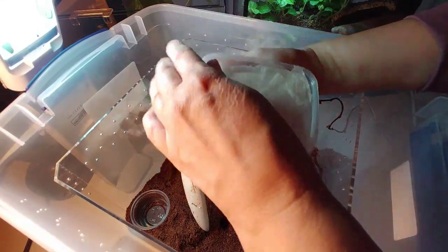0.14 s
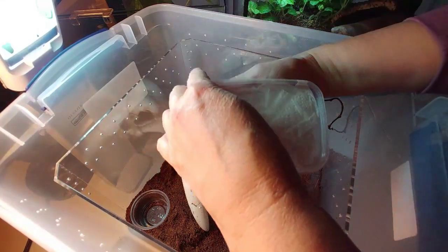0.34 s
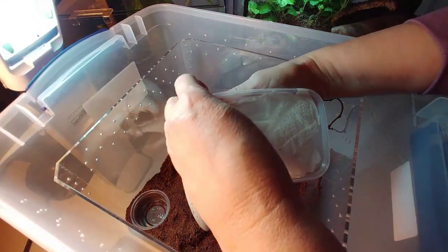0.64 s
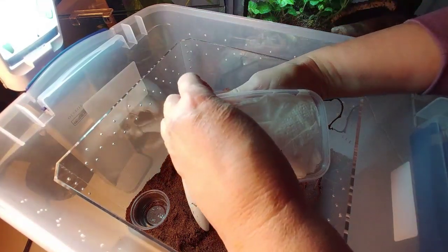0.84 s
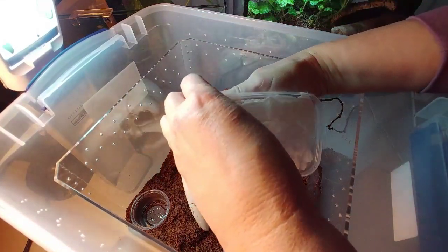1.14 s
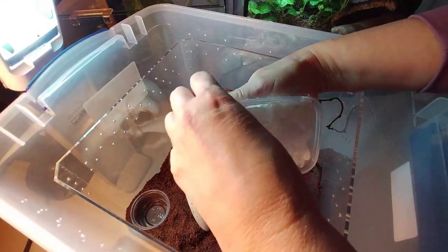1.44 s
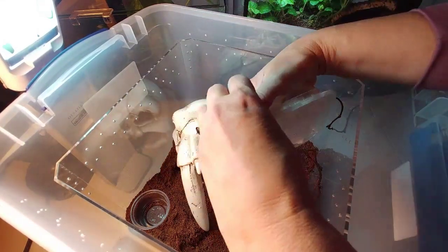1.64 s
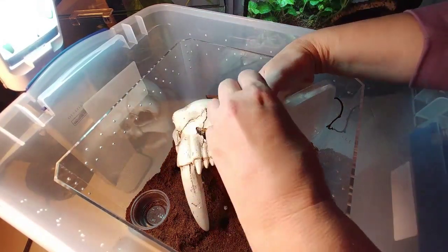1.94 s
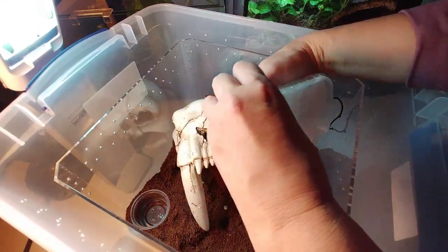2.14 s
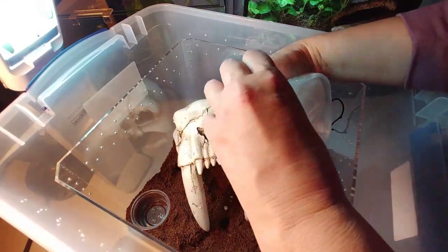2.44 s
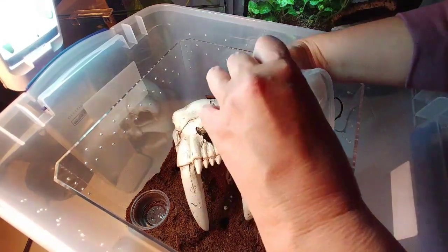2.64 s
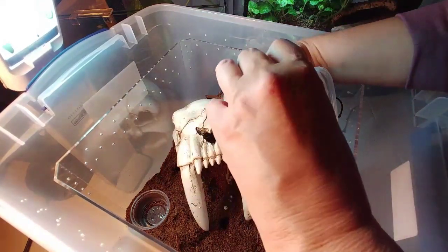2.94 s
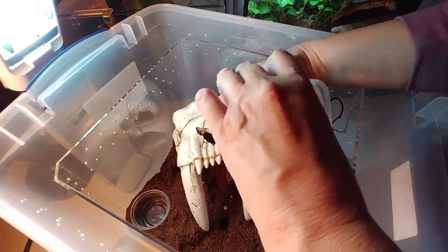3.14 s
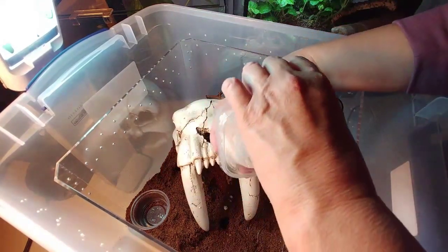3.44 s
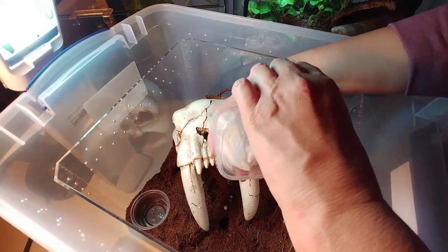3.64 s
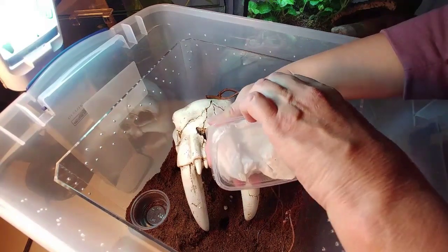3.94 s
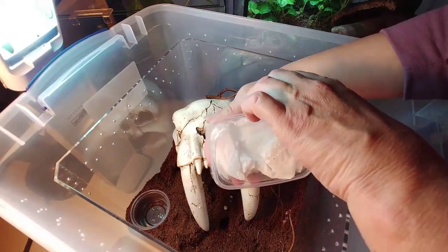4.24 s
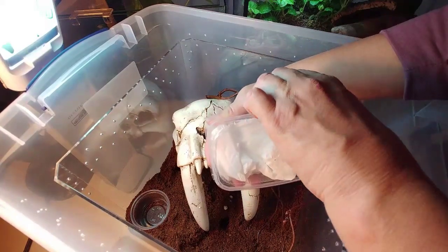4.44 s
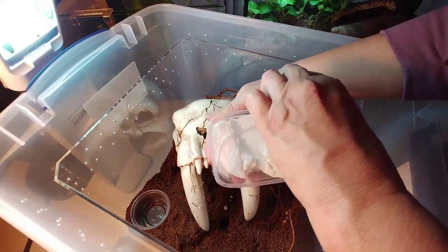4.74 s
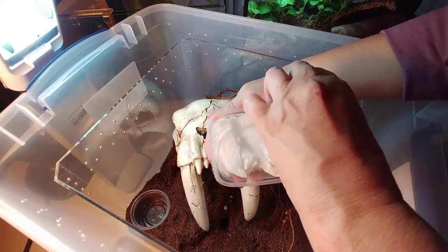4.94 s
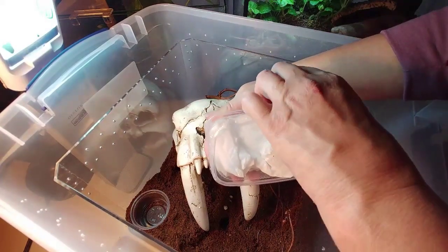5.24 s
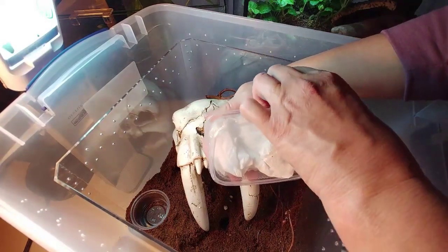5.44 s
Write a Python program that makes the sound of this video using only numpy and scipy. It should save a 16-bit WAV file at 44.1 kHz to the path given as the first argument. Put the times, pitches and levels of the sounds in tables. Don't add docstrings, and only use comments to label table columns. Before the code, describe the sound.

Close stereo sound of hands working a thin plastic container lid inside an open plastic storage bin. Quiet skin rubbing and a small early snap come first, then faint ticks and a brief hollow drag. A very loud crack bursts just after two seconds, with bumping and tapping; another follows near 3.3 seconds with chatter. Smaller snaps trail off in a small quiet room.

```python
import sys
import numpy as np
from scipy import signal
from scipy.io import wavfile
from scipy.ndimage import uniform_filter1d, minimum_filter1d

SR = 44100
rng = np.random.default_rng(int(sys.argv[2]) if len(sys.argv) > 2 else 0)


def digitize_waveform(pressure):
    field = np.atleast_2d(pressure).T
    bounded = np.clip(field, -1, 1)
    quanta = np.round(bounded * 32767).astype(np.int16)
    wavfile.write(sys.argv[1], SR, quanta)


def natural_amplitude(level_db):
    exponent = np.asarray(level_db, float) / 20
    return 10 ** exponent


N = 246066

# frequency in Hz, density in dB per Hz.
ROOM_TONE = [(25, 1), (59, -5.5), (129, 0), (261, -13), (936, -20.5), (1620, -29), (2210, -28),
             (12700, -46)]
# frequency in Hz, level in dB.
MAINS_HUM = [(60, -73.5), (120, -71.5)]
# time in seconds, level in dB.
GRIP_LEVEL = [(0.0, -72), (0.12, -81.5), (0.24, -79.5), (1.1, -86), (1.3, -71.5), (1.51, -84.5),
              (1.9, -86.5), (2.17, -71), (2.35, -72.5), (2.47, -78.5), (2.69, -68.5), (2.73, -81),
              (3.15, -80.5), (3.36, -68), (3.62, -74.5), (4.4, -82.5), (5.3, -83), (5.58, -76)]
GRIP_SHARES = (-5.5, -0.5, -11.5)
# start in seconds, length in seconds, level in dB, patch frequency in Hz.
FINGER_SLIDES = [(0.0, 0.22, -79, 4330), (0.29, 0.036, -73, 3200), (0.347, 0.088, -76.5, 3200),
                 (0.469, 0.011, -73, 5500), (0.766, 0.1, -73, 2270), (1.062, 0.093, -69, 2300),
                 (1.177, 0.071, -72.5, 4570), (1.287, 0.046, -58.5, 4600), (1.347, 0.026, -67.5, 5700),
                 (2.123, 0.036, -60.5, 5670), (2.32, 0.024, -58, 3430), (2.549, 0.12, -67, 1070),
                 (2.812, 0.061, -70, 8400), (2.861, 0.09, -72.5, 1220), (3.171, 0.066, -58, 1086),
                 (3.237, 0.059, -53.5, 617), (3.298, 0.098, -56, 5217), (3.466, 0.078, -76, 8130),
                 (3.681, 0.032, -81.5, 8200), (3.787, 0.022, -76.5, 1290), (3.884, 0.03, -64.5, 4420),
                 (3.912, 0.094, -68.5, 8540), (4.318, 0.045, -70, 1130), (4.616, 0.093, -77.5, 2496),
                 (4.735, 0.044, -70, 1308), (4.762, 0.07, -66, 3930), (4.944, 0.034, -65.5, 8650),
                 (5.133, 0.045, -64, 1674), (5.184, 0.049, -80.5, 5200), (5.535, 0.061, -73.5, 1200),
                 (3.273, 0.019, -52, 4500), (2.817, 0.032, -66.5, 1301), (1.279, 0.018, -71, 4400),
                 (2.031, 0.094, -84, 2230), (3.224, 0.022, -56, 3200), (3.35, 0.075, -61, 5000),
                 (3.375, 0.04, -63, 1900), (4.925, 0.022, -71, 4300), (5.0, 0.06, -80, 4500),
                 (0.03, 0.16, -85, 8000), (1.075, .06, -77, 1300), (3.98, .12, -74, 330)]
# time in seconds, level in dB.
STIR_LEVEL = [(0.0, -76), (2.11, -74), (2.21, -56.5), (2.33, -54), (2.69, -58.5), (2.73, -71), (3.1, -75.5),
              (3.23, -59), (3.45, -69.5), (3.93, -62.5), (4.05, -68), (4.2, -71.5), (4.33, -66),
              (4.5, -76.5), (4.79, -65.5), (5.35, -71), (5.58, -72)]
# start in seconds, peak in dB, frequency in Hz.
FINGER_TAPS = [(0.0267, -69, 790), (1.5706, -52, 1220), (2.013, -62, 800), (2.3283, -47, 480),
               (2.497, -50, 330), (2.575, -52, 330), (2.599, -50, 800), (2.6193, -38, 1010),
               (2.6928, -55, 1054), (2.8389, -47, 1200), (2.9281, -46, 453), (3.1893, -47, 1028),
               (3.196, -45, 960), (3.203, -41, 900), (3.3685, -39.5, 960), (3.516, -48.5, 1100),
               (3.75, -58.5, 1104), (3.7922, -56.5, 1076), (4.3369, -54.5, 1001), (4.76, -52, 1008),
               (4.884, -64.5, 622), (4.958, -50, 1048), (5.1402, -45, 530), (5.1403, -55, 1080),
               (5.56, -50, 447), (5.5657, -40, 788), (5.573, -40, 1090), (5.5765, -41.5, 1250)]
# start in seconds, peak in dB, frequency in Hz, decay in cycles,
# left minus right in dB.
WALL_POPS = [(0.482, -45, 840, 1.8, 5), (1.3116, -45, 665, 0.31, 1), (2.1518, -12, 733, 1.4, 4.5),
             (2.151, -12, 1990, 3.1, 10), (2.156, -11.5, 1282, 3.75, -4), (2.8849, -40, 714, 1, -10),
             (2.889, -43, 1285, 2, 4), (3.2229, -18, 683, 0.54, -5.5), (3.229, -30, 518, 3.6, -3),
             (3.2879, -13, 1210, 3.1, -1), (3.2884, -26, 524, 2.2, -13), (3.289, -14.5, 2158, 2.5, 2.5),
             (1.298, -51, 610, 1.5, 4), (3.9086, -35, 1120, 1.43, -0.5), (3.97, -29.5, 1022, 0.76, -1),
             (4.7703, -30, 1220, 3.15, 0), (4.771, -36, 543, 1.9, 1.5), (4.9307, -35, 436, 1.2, -9.5),
             (4.932, -40, 1050, 3, 1), (5.173, -42.5, 861, 0.83, -4.5), (5.187, -31.5, 1200, 2.7, 0)]
# start in seconds, peak in dB, frequency in Hz,
# decay in cycles, left minus right in dB.
LID_CHATTER = [(3.297, -35, 1100, 1.5, 0), (3.309, -35, 880, 1.5, 0), (3.314, -39, 1270, 1.5, 0),
               (3.321, -43, 1170, 1.5, 0), (3.331, -43, 1310, 1.5, 0), (3.338, -43, 821, 1.5, 0),
               (3.347, -42, 1240, 1.5, 0), (3.2882, -18, 4350, 6.8, 0), (5.1875, -36, 4160, 6, -1),
               (5.1875, -35.5, 2450, 5.1, 0), (5.192, -35, 5200, 13, 0), (4.7712, -34.5, 1860, 5, 0),
               (4.7716, -37, 2950, 7, 0), (2.8925, -47, 810, 1.2, 0), (1.3138, -43.5, 3500, 1.4, 0),
               (1.319, -48, 2950, 3, 0), (1.322, -50, 4500, 3, 2), (5.8, -51, 450, 1.5, 0),
               (4.9615, -55, 2050, 5, 0), (5.8, -61, 990, 5, 0), (3.238, -37, 520, 3, 0),
               (2.1608, -26, 3400, 3, 0), (2.165, -29, 3000, 3, 0)]
# start in seconds, peak in dB, frequency in Hz,
# decay in cycles, left minus right in dB.
DRY_FLARES = [
    (2.3225, -47, 2500, 5, 0),
    (2.328, -49, 3500, 5, 0),
    (3.2885, -28, 7700, 10, 0),
    (3.2885, -24, 1850, 3, 3),
    (4.9605, -56, 1050, 4, 0),
    (4.772, -42, 760, 2, 0),
]
# frequency in Hz, width in Hz, level in dB.
TUB_MODES = [(337, 160, -6), (530, 190, 0), (800, 580, -3.5), (1220, 270, 3.5)]
# frequency in Hz, width in Hz, level in dB.
LID_MODES = [(1200, 350, 3.5), (1780, 910, 0.5), (2530, 1000, 1), (3440, 950, 0), (4210, 590, -1.5),
             (5200, 1300, -6)]
# frequency in Hz, width in Hz, level in dB.
LID_TREBLE = [(7168, 2100, -3.5), (9010, 1500, 3.5), (10900, 1600, -7)]
# frequency in Hz, level in dB, 60 dB decay in seconds.
ROOM_ECHO = [(150, -43.5, .25), (378, -34, 0.6), (900, -30.5, 0.26), (1980, -37, 0.38), (3200, -41, 0.32),
             (4640, -36, .27), (7700, -32, 0.27), (11837, -39.5, 0.18)]
# start in seconds, peak in dB, treble relative to it in dB,
# length in milliseconds, left minus right in dB.
RIM_CRACKS = [(0.4802, -31.5, -17, 1.97, 0.5), (0.484, -51.5, -1.5, 2.6, 8), (1.293, -64, -14, 2.3, 0),
              (1.301, -57, -14, 2.5, 0), (1.306, -49, -14, 2.6, 5), (1.311, -45, -11, 1.2, -3),
              (1.3153, -44.5, -7, 1.1, 2), (2.1516, -8, -1, 0.82, 2), (2.1556, -7.5, -16.5, 0.65, 4),
              (2.3216, -47, -8, 4, 1.5), (3.288, -9.5, -14.5, 0.75, -2.5), (3.9078, -25.5, -2.5, 3.2, 3),
              (4.7713, -25, -3, 1.97, -3.5), (4.961, -53, 3, 2.8, 4), (5.1734, -42.5, -7, 1.3, -6),
              (5.1871, -26, -7.5, 1.2, 1), (5.19, -37.5, -23, 2.2, 7)]
# start in seconds, peak in dB, treble relative to it in dB,
# left minus right in dB.
LID_CLICKS = [(1.5699, -61, -9, 0), (2.619, -51.5, -24, -3.5), (2.838, -51.5, 4, -9),
              (2.8843, -57, -4, -2.5), (2.889, -54, -6.5, 0), (2.926, -54.5, -15, 1.5),
              (3.205, -51, -18, -4.5), (3.222, -30, -12.5, -2), (3.7103, -60, -8, -7),
              (3.7916, -60, -12, 1.5), (3.9687, -47.5, -12, 4.5), (4.3352, -60, -12, 9),
              (4.6788, -61.5, -18, 4), (4.703, -60, -11, -4), (5.14, -54, -14.5, -2.5)]
# start in seconds, peak in dB.
RIM_TICKS = [(0.6012, -71), (0.7777, -62), (1.055, -65.5), (1.186, -64), (1.4316, -66), (1.4955, -67.5),
             (3.5125, -68.5), (4.1332, -67), (4.456, -70), (4.5, -70.5), (4.8847, -75), (4.93, -60.5),
             (5.0332, -67.5), (5.446, -67), (5.5654, -68.5)]
# start in seconds, level in dB, frequency in Hz, width in Hz,
# 60 dB decay in seconds.
RIM_SHIVERS = [(0.48, -61, 5200, 650, 0.19), (2.157, -33.5, 2740, 2400, 0.36),
               (3.29, -39.5, 4400, 1500, 0.25), (3.29, -35.5, 3000, 3000, 0.18),
               (3.972, -57, 1260, 1400, 0.22), (4.772, -53, 4100, 2700, 0.22),
               (2.157, -42, 8500, 1500, 0.28), (4.771, -53, 1210, 200, 0.2), (4.938, -43.5, 390, 260, 0.11),
               (5.19, -50, 5150, 800, 0.22), (5.189, -51, 4000, 2200, 0.15), (5.195, -62, 1095, 300, 0.33),
               (3.24, -44, 560, 250, 0.22), (3.245, -52, 1250, 400, 0.3), (3.3, -45.5, 5200, 900, 0.33),
               (2.929, -56.5, 520, 360, 0.095)]
# start in seconds, peak in dB, boom frequency in Hz, decay in cycles.
BIN_THUMPS = [(0.481, -54.5, 159, 5.1), (2.149, -33.5, 177, 1.5), (2.157, -53, 39.5, 0.81),
              (2.182, -35, 115.4, 2.8), (2.248, -43.5, 50.4, 0.97), (2.331, -49.5, 60.5, 1.5),
              (2.429, -51, 42.3, 1.14), (2.495, -41.5, 140.1, 0.92), (2.506, -43, 64.4, 1.2),
              (2.573, -38.5, 139.6, 1.03), (3.219, -37, 93, 0.57), (3.287, -37.5, 144, 1.2),
              (3.509, -58.5, 74.4, 1.13), (3.698, -60.5, 85.6, 0.98), (3.905, -51, 142.5, 0.97),
              (4.28, -56, 55.7, 1.2), (4.771, -60, 201, 0.85), (4.93, -42.5, 190, 1.05),
              (5.172, -47, 200, 1.2), (5.562, -48.5, 166, 0.82)]
# start in seconds, peak in dB, left minus right in dB.
NAIL_CATCHES = [
    (2.1304, -33, -13.5),
    (2.8385, -50, -5),
    (5.141, -50, 0),
    (4.884, -60, 0),
    (1.306, -46, 0),
    (1.308, -46, 0),
    (1.3098, -46, 0),
    (1.3165, -47, 0),
    (3.2235, -38, 0),
]
# time in seconds, level in dB, shell frequency in Hz.
DRAG_PATH = [
    (1.695, -92, 390),
    (1.719, -60.5, 388),
    (1.757, -62, 381),
    (1.785, -64.5, 400.2),
    (1.917, -65, 364),
    (1.973, -68.5, 375.3),
    (1.995, -63, 380.4),
    (2.069, -66.5, 371.4),
    (2.12, -70, 350),
]
# frequency in Hz, width in Hz, level in dB.
SHELL_OVERTONES = [(840, 250, -17.5), (1920, 220, -17), (2230, 300, -11.5), (3630, 2300, -21.5)]
# start in seconds, level in dB.
RIM_STRIKES = [
    (2.157, -34),
    (3.29, -38),
    (4.772, -49.5),
    (5.19, -53),
]
# frequency in Hz, level in dB, 60 dB decay in seconds.
FIRST_HOLD = [(727, -16, 0.89), (910, -13, 0.24), (1367, 0, 0.11), (1852, -14, 0.38), (2875, -2, 0.12),
              (3620, 0, 0.13), (4441, -4, 0.16), (5679, -12, 0.21), (7607, -11, 0.17), (7704, -15, 0.2),
              (8419, -13, 0.22), (8522, -15, 0.28), (9496, -23, 0.24), (9981, -29, 0.4)]
SECOND_HOLD = [(1238, -6, 0.39), (1910, -8, 0.2), (2960, -2, 0.16), (3391, -9, 0.24), (4075, 0, 0.14),
               (4253, -5, 0.25), (4500, -4, 0.23), (4576, -13, 0.97), (4823, -5, 0.26), (5070, -1, 0.094),
               (5125, -3, 0.11), (5303, -29, 5.0), (8247, -22, 0.81), (8484, -15, 0.21)]
THIRD_HOLD = [(1141, -6, 0.18), (1378, -10, 0.15), (1653, -11, 0.14), (1857, -4, 0.11), (2460, -8, 0.15),
              (2950, -2, 0.16), (3499, 3, 0.089), (3930, -11, 0.29), (4404, -13, 0.3), (4560, -7, 0.14),
              (4657, -23, 0.23), (5055, -16, 0.24), (5566, -14, 0.22), (6089, -10, 0.12)]
LAST_HOLD = [(958, -9, 0.15), (1232, -9, 0.2), (2444, -4, 0.1), (3548, -12, 0.23), (4032, -11, 0.24),
             (4339, -19, 0.43), (4727, -1, 0.12), (5039, -13, 0.43), (5179, -8, 0.3), (6019, -20, 0.24)]


def unit(x):
    return x / np.sqrt(np.mean(x ** 2))


def band(x, hz, width_hz):
    return signal.lfilter(*signal.iirpeak(hz, hz / width_hz, fs=SR), x)


def band_twice(x, hz, width_hz):
    return band(band(x, hz, width_hz), hz, width_hz)


def modes(x, table):
    return sum((-1) ** k * natural_amplitude(db) * band(x, hz, width_hz) for k, (hz, width_hz, db) in enumerate(table))


def curves(table, off_db=-120):
    times, *columns = np.transpose(table)
    return [np.interp(np.arange(N) / SR, times, column, off_db, off_db) for column in columns]


def walk(rate):
    hold = int(SR / rate)
    steps = np.repeat(rng.standard_normal(N // hold + 1), hold)
    return 1.3 * uniform_filter1d(uniform_filter1d(steps, hold), hold)[:N]


def lean(left_minus_right_db):
    return natural_amplitude(np.array([[left_minus_right_db], [-left_minus_right_db]]) / 2)


def add(out, start_s, sound):
    i = int(start_s * SR)
    out[:, i:i + sound.shape[1]] += sound[:, :N - i]


def peak(x, db):
    return x * natural_amplitude(db) / np.max(np.abs(x.mean(axis=0)))


def air(level_db=-69.5, lean_db=4.5):
    tone, t = 0, np.arange(N) / SR
    table = np.array(ROOM_TONE)
    for hz in 28 * 2 ** np.arange(0, 9, .5):
        noise = unit(band_twice(rng.standard_normal((2, N)), hz, hz / 2))
        density_db = np.interp(np.log(hz), np.log(table[:, 0]), table[:, 1])
        db = density_db + 10 * np.log10(hz)
        tone = tone + natural_amplitude(db + 0.54 * walk(5.8)) * noise
    hum = 0
    for hz, db in MAINS_HUM:
        level = natural_amplitude(db + 1.6 * walk(7.1)) * np.sqrt(2)
        hum = hum + level * np.sin(2 * np.pi * hz * t + 0.63 * walk(14))
    return unit(tone) * natural_amplitude(level_db) * lean(lean_db) + hum


def hiss(db=-97, hz=8300, width_hz=1200):
    noise = rng.standard_normal((2, N))
    return natural_amplitude(db + 1.5 * walk(4)) * unit(band_twice(noise, hz, width_hz))


def rub(flicker_db=1.0, flicker_rate=60, edge=1.0, patchy_db=1.0, squeak_db=-1.0):
    slips = rng.standard_normal((2, N)) * natural_amplitude(2.1 * rng.exponential(size=(2, N)))
    gains = natural_amplitude(curves(GRIP_LEVEL) + np.array(GRIP_SHARES)[:, None])
    out = np.zeros((2, N))
    middle_hz, middle_db, db_per_octave = 3001, np.array((-3, -1.5, -18)), np.array((3.5, -0.5, 2))
    for s, length_s, slide_db, hz in FINGER_SLIDES:
        db = slide_db + middle_db + db_per_octave * np.log2(hz / middle_hz)
        i, size = int(s * SR), int(length_s * SR)
        swell = (np.sin(np.pi * np.arange(size) / size) ** edge)[:N - i]
        gains[:, i:i + size] += natural_amplitude(db)[:, None] * swell
        patch = unit(band_twice(slips[:, i:i + size], hz, .28 * hz))
        add(out, s, patch * swell * natural_amplitude(slide_db + squeak_db))
    hiss_body_top = LID_MODES[2:], TUB_MODES[2:] + LID_MODES[1:2], LID_TREBLE[:2]
    for table, gain in zip(hiss_body_top, gains):
        ringing = 0
        for hz, width_hz, db in table:
            ringing = ringing + natural_amplitude(db + patchy_db * walk(15)) * band_twice(slips, hz, 1.9 * width_hz)
        out = out + gain * unit(ringing)
    return out * natural_amplitude(flicker_db * walk(flicker_rate))


def stir(alike=0.68):
    noise = rng.standard_normal((3, N))
    shake = alike * noise[0] + noise[1:]
    walls = modes(shake, [(48.6, 17, -4.5), (112, 18, 4.5), (190, 40, -3.0), (330, 110, -5)])
    return unit(walls) * natural_amplitude(curves(STIR_LEVEL)[0] + 4 * walk(14))


def knocks(blows, soft_turns=0.37, rattle=0.81, rattle_s=0.0033, tub_db=-5, push_turns=.2):
    out, t = np.zeros((2, N)), np.arange(2048) / SR
    for s, db, hz, cycles, pan_db in blows:
        turns = hz * t
        rise = 1 - np.exp(-(turns / soft_turns) ** 2)
        ring = -np.sin(2 * np.pi * turns) * rise * np.exp(-turns / cycles)
        tub = modes(np.exp(-(turns / push_turns - 2) ** 2), TUB_MODES)
        shake = rng.standard_normal((2, len(t))) * rise * np.exp(-t / rattle_s)
        dull = band(band_twice(shake, hz, 1.5 * hz), hz, 1.5 * hz)
        sound = unit(ring) + natural_amplitude(tub_db) * unit(tub) + rattle * unit(dull)
        add(out, s, peak(sound, db) * lean(pan_db))
    return out


def echoes(x, bin_db=6, bin_t60=0.024, build_s=0.009, top_hz=11800):
    t = np.arange(SR // 2) / SR
    response = 0
    for hz, db, t60 in ROOM_ECHO:
        fade = 1000. ** (-t / t60) + natural_amplitude(bin_db) * 1000. ** (-t / bin_t60)
        noise = band_twice(rng.standard_normal((2, len(t))), hz, 0.45 * hz)
        response = response + natural_amplitude(db) * noise * fade
    response = response * (1 - np.exp(-(t / build_s) ** 2))
    response = signal.sosfilt(signal.butter(6, top_hz, fs=SR, output="sos"), response)
    return signal.fftconvolve(x, response, axes=1)[:, :N]


def snaps(rise_s=0.0005, tail_times=6.2, tail_db=-17, apart=2.4, favour_db=3):
    near, far, t = np.zeros((2, N)), np.zeros((2, N)), np.arange(2048) / SR
    slips = [(*row, 4700) for row in RIM_CRACKS]
    slips += [(s, db, top_db, 2.3, pan_db, 1900) for s, db, top_db, pan_db in LID_CLICKS]
    slips += [(s, db, -9, 1.9, 0, 3340) for s, db in RIM_TICKS]
    for s, db, top_db, ms, pan_db, hz in slips:
        tail = natural_amplitude(tail_db) * np.exp(-1000 * t / ms / tail_times)
        shape = (1 - np.exp(-(t / rise_s) ** 2)) * (np.exp(-1000 * t / ms) + tail)
        shake = rng.standard_normal((3, len(t))) * shape
        shake = np.vstack([shake[0] + apart * shake[1:], t == 0])
        lid = modes(shake, LID_MODES[1:])
        body = lid + natural_amplitude(favour_db) * band(lid, hz, 0.36 * hz)
        treble = modes(shake, LID_TREBLE)
        for part, part_db in ((body, db), (treble, db + top_db)):
            sound = peak(part[:2], part_db)
            add(near, s, sound * lean(pan_db))
            add(far, s, unit(part[[2, 2]]) * np.std(sound))
    return near, far


def rings(rise_s=.003):
    out, t = np.zeros((2, N)), np.arange(SR // 4) / SR
    for s, db, hz, width_hz, t60 in RIM_SHIVERS:
        cluster = band_twice(rng.standard_normal((2, len(t))), hz, width_hz)
        add(out, s, natural_amplitude(db) * unit(cluster) * (1 - np.exp(-t / rise_s)) * 1000. ** (-t / t60))
    return out


def thumps(lean_db=-9, sag=0.067):
    out, t = np.zeros((2, N)), np.arange(8192) / SR
    for s, db, hz, cycles in BIN_THUMPS:
        turns = hz * t
        swell = (1 - np.exp(-(turns / 0.1) ** 2)) * np.exp(-turns / cycles)
        boom = np.sin(2 * np.pi * turns ** (1 - sag)) * swell
        add(out, s, peak(boom * lean(lean_db), db))
    return signal.sosfilt(signal.butter(2, 32, "high", fs=SR, output="sos"), out)


def nail(hz=4000, width_hz=9000):
    out = np.zeros((2, N))
    tick = band(-1. * (np.arange(256) == 0), hz, width_hz)
    for s, db, pan_db in NAIL_CATCHES:
        add(out, s, peak(tick * lean(pan_db), db))
    return out


def drag(width_hz=22, lean_db=-6):
    level_db, hz = curves(DRAG_PATH)
    noise = rng.standard_normal(N) + 1j * rng.standard_normal(N)
    wander = signal.lfilter([1], [1, -np.exp(-np.pi * width_hz / SR)], noise)
    turns = np.cumsum(np.maximum(hz, 0)) / SR
    shell = unit(np.real((wander / np.std(wander) + 1.2) * np.exp(2j * np.pi * turns)))
    grit = rng.standard_normal((2, N))
    overtones = 0
    for f, w, db in SHELL_OVERTONES:
        overtones = overtones + natural_amplitude(db + 2.0 * walk(33)) * unit(band_twice(grit, f, w))
    return natural_amplitude(level_db) * (shell * lean(lean_db) + overtones)


def rim(rise_s=.002, split=.006, twin_db=-5, longest_s=.35):
    out, t = np.zeros((2, N)), np.arange(SR // 3) / SR
    for (s, hit_db), table in zip(RIM_STRIKES, (FIRST_HOLD, SECOND_HOLD, THIRD_HOLD, LAST_HOLD)):
        for hz, db, t60 in table:
            phase = 2 * np.pi * rng.random((2, 2, 1))
            line = np.sin(2 * np.pi * hz * t + phase[0])
            twin = np.sin(2 * np.pi * hz * (1 + split) * t + phase[1])
            fade = (1 - np.exp(-t / rise_s)) * 1000. ** (-t / min(t60, longest_s))
            add(out, s, natural_amplitude(hit_db + db) * (line + natural_amplitude(twin_db) * twin) * fade)
    return out


def scene(knock_send_db=-3, swell=0.68, swell_ms=6):
    cracks, far = snaps()
    taps = [(*row, 0.42, -2) for row in FINGER_TAPS]
    blows = knocks(WALL_POPS + taps + LID_CHATTER)
    loudness = np.abs(cracks + blows).mean(axis=0)
    strength = np.abs(uniform_filter1d(loudness, int(swell_ms * SR / 1000)))
    send = (far + natural_amplitude(knock_send_db) * blows) * (strength / strength.max()) ** swell
    room = air() + hiss() + echoes(send)
    hands = rub() + stir() + nail() + drag()
    ringing = rings() + rim() + knocks(DRY_FLARES)
    return room + hands + cracks + blows + thumps() + ringing


def low_pass(x):
    return signal.sosfilt(signal.butter(12, 12820, fs=SR, output="sos"), x)


def record(dry):
    cut = signal.sosfilt(signal.ellip(6, .5, 40, 12700, fs=SR, output="sos"), dry)
    room_left = np.minimum(1, .88 / (np.abs(cut).max(axis=0) + 1e-9))
    gain = uniform_filter1d(minimum_filter1d(room_left, size=81), size=41)
    return low_pass(cut * gain)


dry = scene()
out = record(dry)
digitize_waveform(out)
```